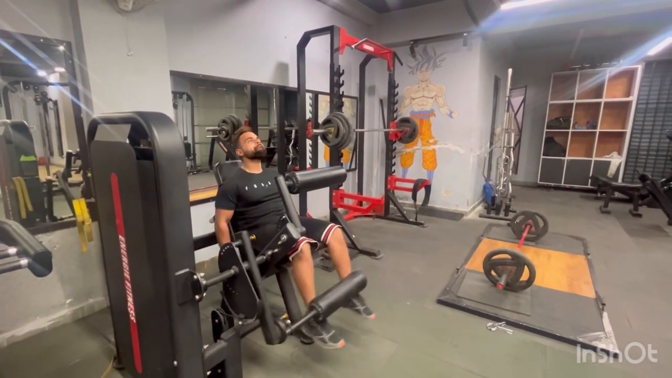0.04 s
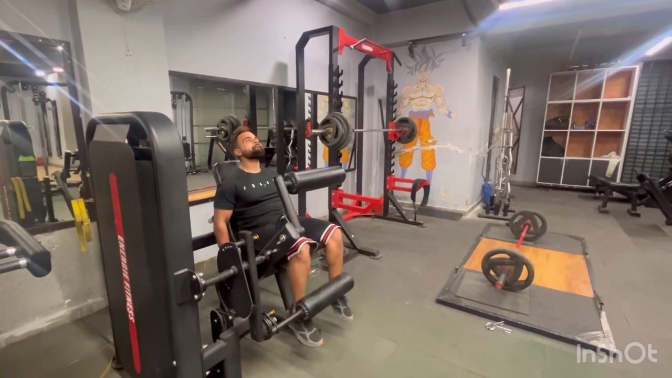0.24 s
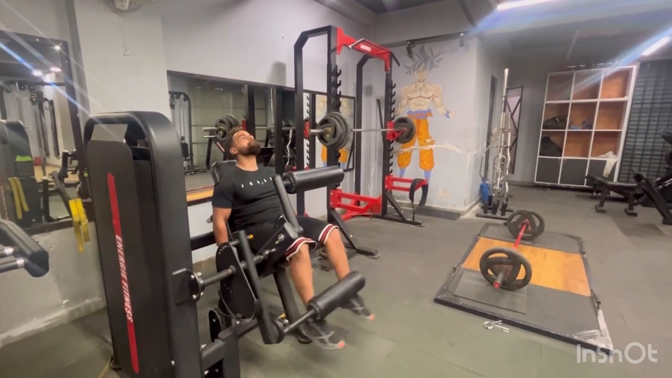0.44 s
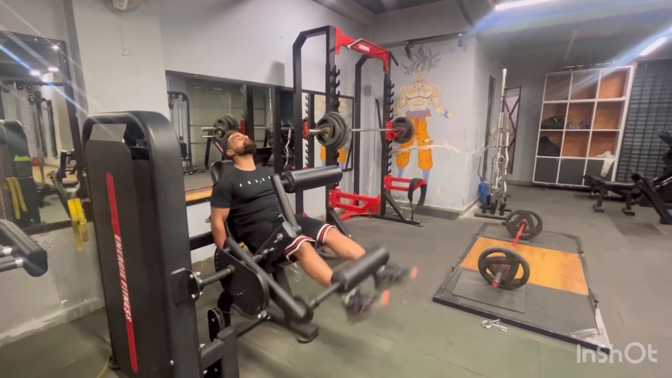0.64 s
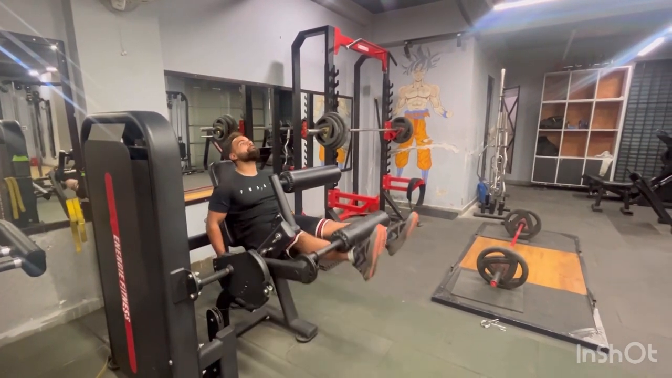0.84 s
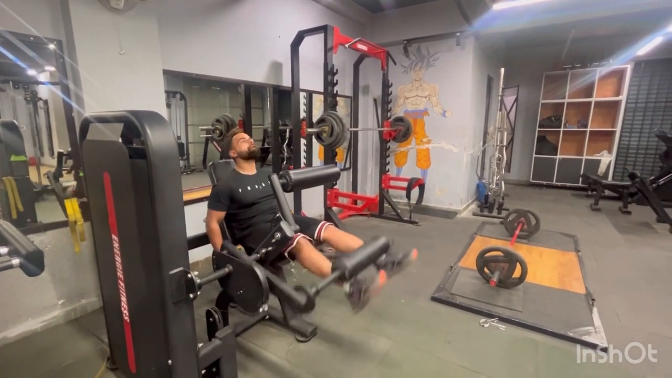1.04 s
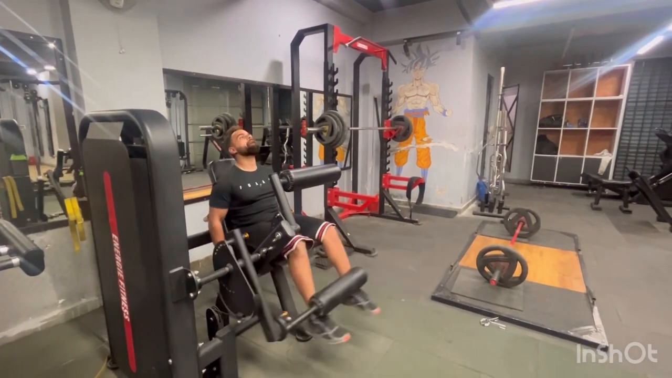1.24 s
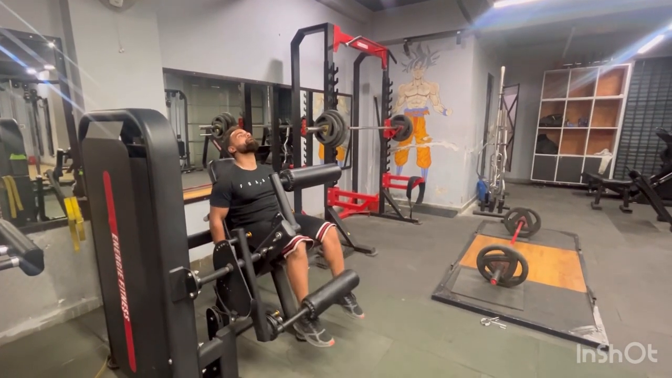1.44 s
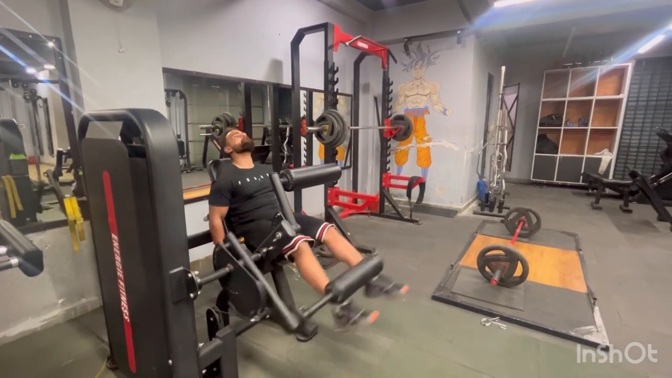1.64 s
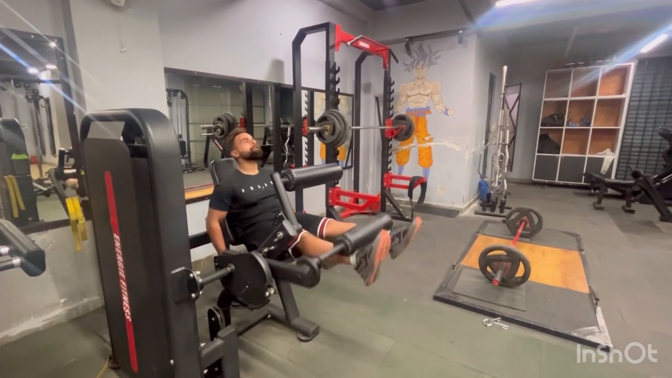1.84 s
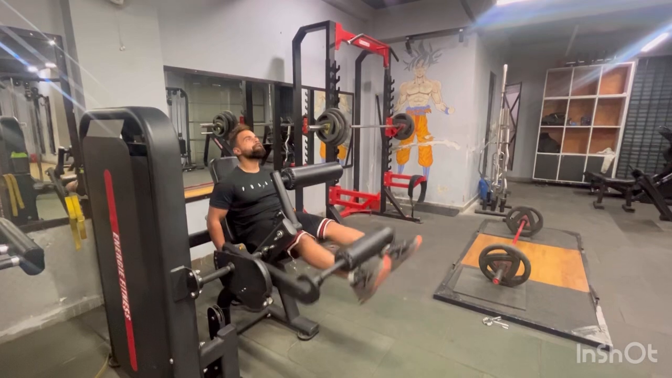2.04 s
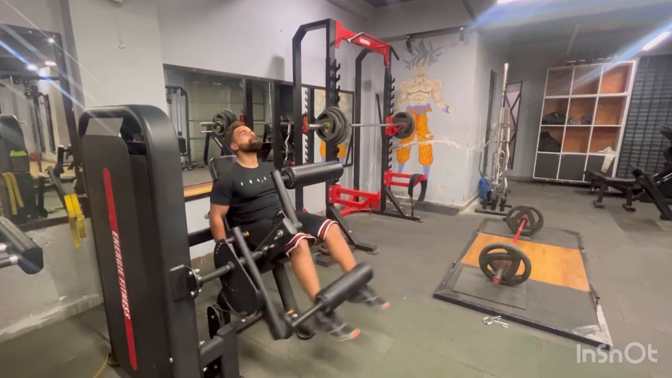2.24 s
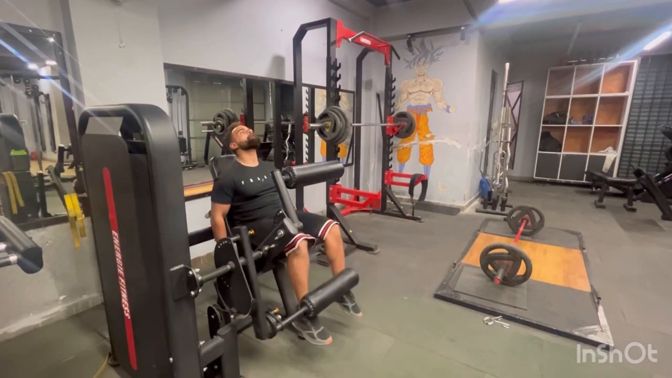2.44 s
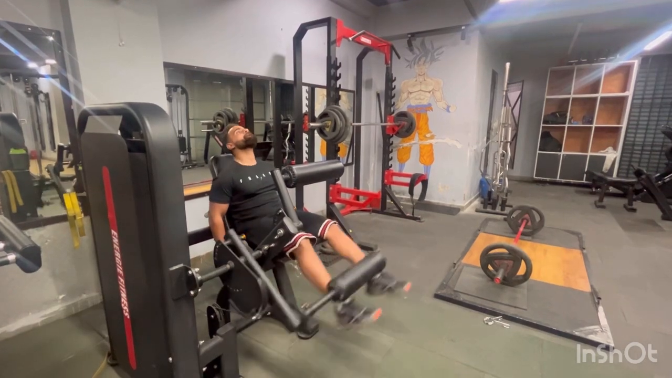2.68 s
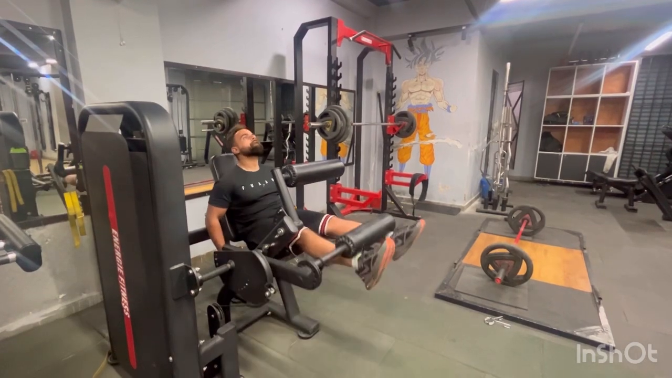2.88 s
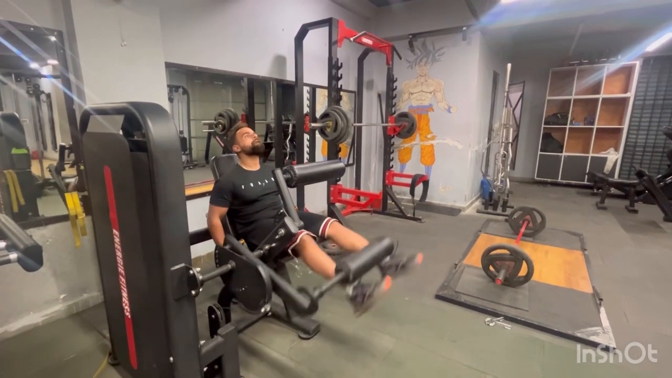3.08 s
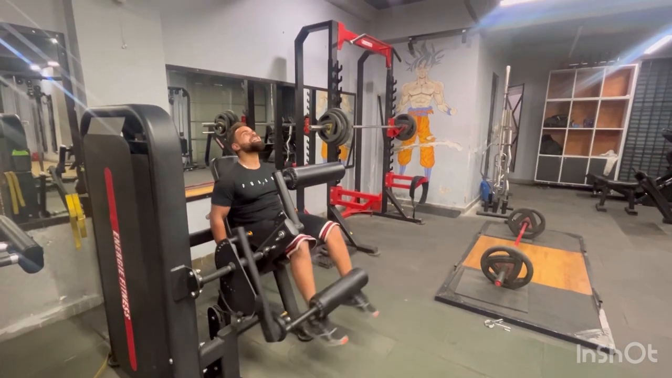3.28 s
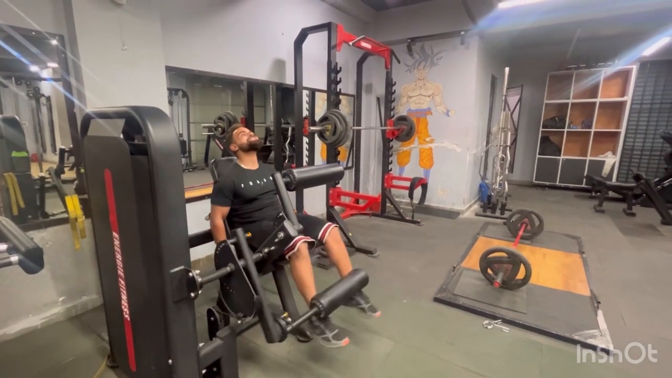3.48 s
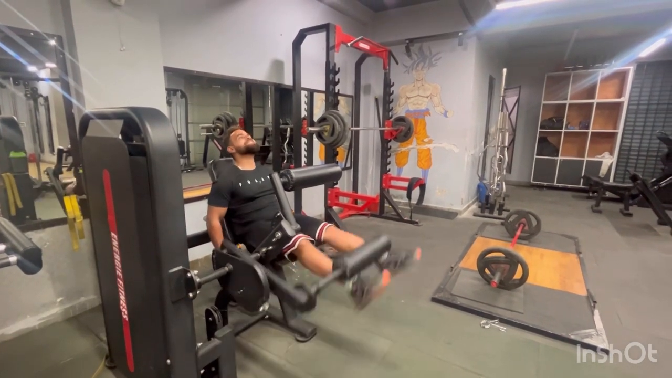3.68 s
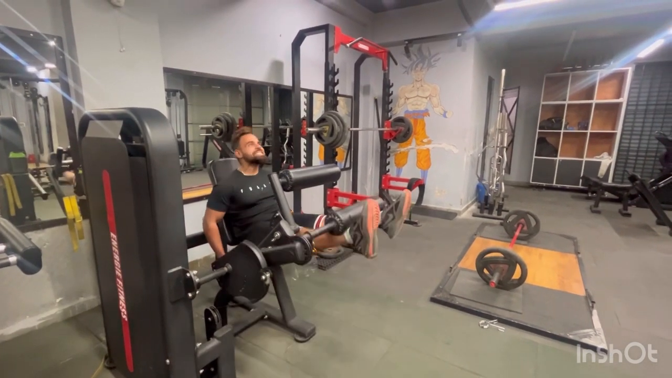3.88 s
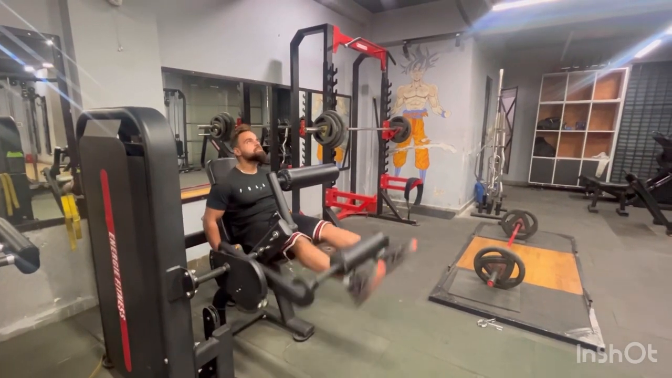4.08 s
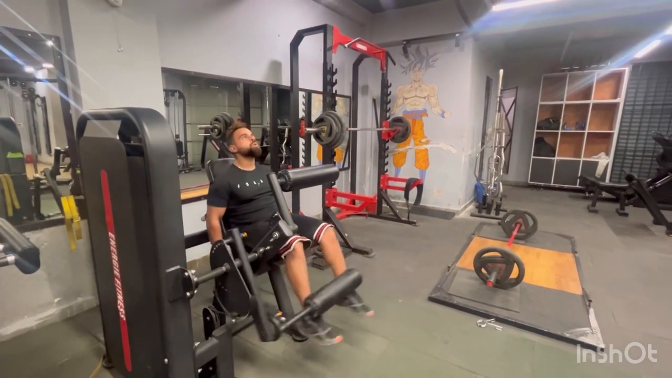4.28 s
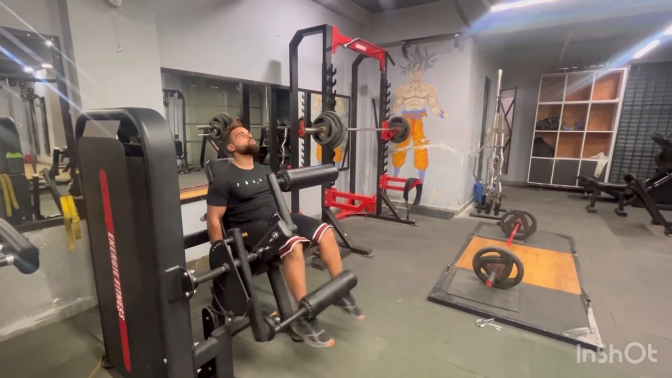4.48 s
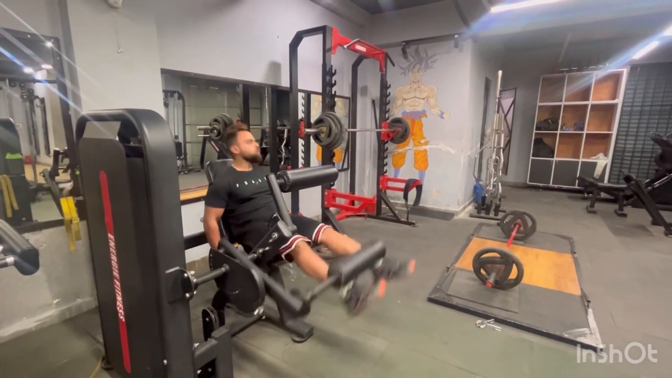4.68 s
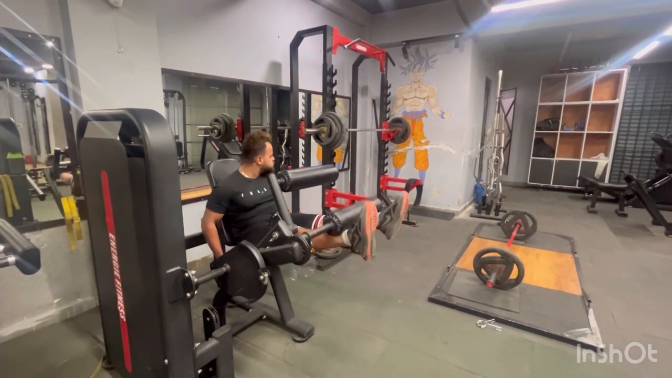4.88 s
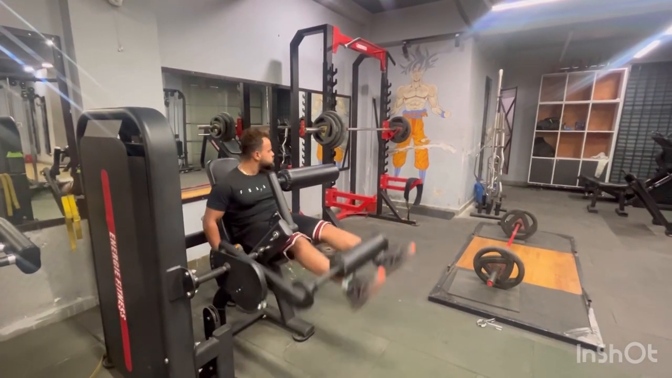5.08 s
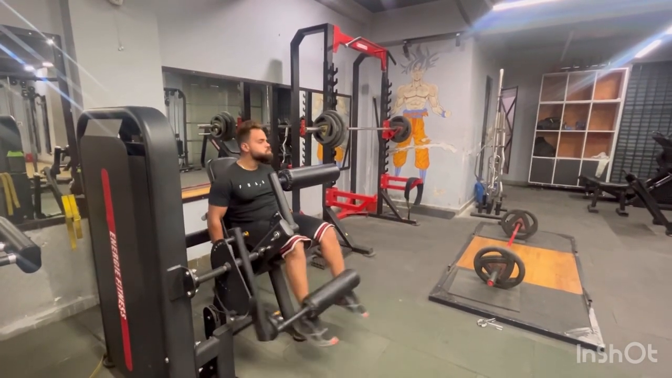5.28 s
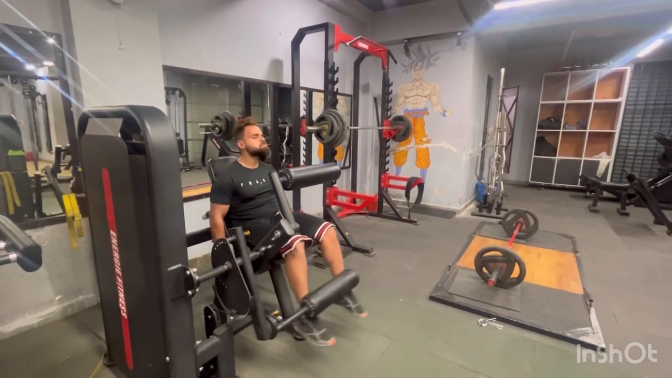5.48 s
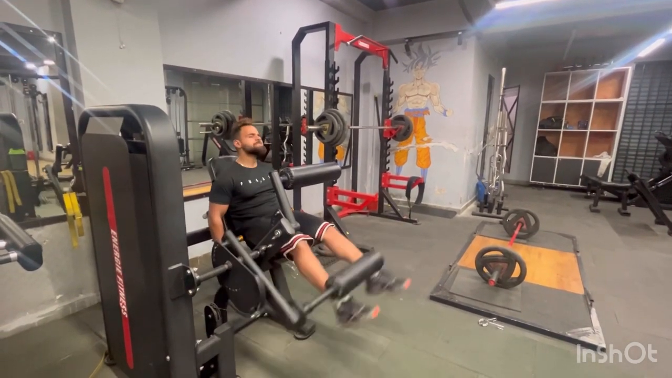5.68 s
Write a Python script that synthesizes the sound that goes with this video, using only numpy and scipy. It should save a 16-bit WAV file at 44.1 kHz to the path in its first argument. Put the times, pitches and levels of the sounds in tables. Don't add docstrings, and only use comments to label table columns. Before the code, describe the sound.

A gym leg machine gives a short piercing squeal and then a metallic clank about once a second, over a low fan hum in an echoing hall.

```python
import sys
import numpy as np
from scipy import signal
from scipy.fft import rfft, irfft
from scipy.io import wavfile

SR = 44100
rng = np.random.default_rng(int(sys.argv[2]) if len(sys.argv) > 2 else 0)


def store_pcm(level_fs):
    pcm = np.round(np.clip(level_fs, -1, 1) * 32767).astype(np.int16)
    wavfile.write(sys.argv[1], SR, np.atleast_2d(pcm).T)


def gain_from_decibels(decibels):
    exponent = np.asarray(decibels, float) / 20
    return 10 ** exponent


N = 252252

# start_s, peak_db, high_db (above 5 kHz), low_db (below 2 kHz), favoured_hz
CLANKS = [
    (0.5531, -24, 0.5, -34, 3240),
    (1.6062, -17, -1.5, -16.5, 3340),
    (2.6381, -23.5, -5, -30, 3120),
    (3.5613, -20, -1.5, -25, 3980),
    (4.5928, -22.5, 0, -22.5, 4200),
    (5.1811, -28.5, -11, -2.5, 3450),
    (5.602, -20, 2, -11, 3470),
]


def at_hz(points, hz):
    points_hz, values = np.transpose(points)
    return np.interp(np.log(hz + 1), np.log(points_hz), values)


def rms_one(x):
    return x / np.sqrt(np.mean(x ** 2) + 1e-20)


def drift(rate_hz):
    r = np.exp(-2 * np.pi * rate_hz / SR)
    wander = signal.lfilter([1], [1, -2 * r, r * r], rng.standard_normal(N + SR))
    return rms_one(wander[SR:])


def band_pass(x, low_hz, high_hz):
    return signal.sosfilt(signal.butter(2, [low_hz, high_hz], "band", fs=SR, output="sos"), x)


def diffuse(spectrum):
    # freq_hz, likeness (0 to 1)
    likeness = [(60, 0.96), (150, 0.92), (380, 0.88), (950, 0.12), (2400, 0.45), (6000, 0.13),
                (11000, 0.13), (14000, 0.81)]
    hz = np.fft.rfftfreq(N, 1 / SR)
    mid, side = rfft(rng.standard_normal((2, N))) * gain_from_decibels(at_hz(spectrum, hz))
    alike = np.clip(at_hz(likeness, hz), 0, 1)
    both = np.sqrt(1 + alike) * mid
    apart = np.sqrt(1 - alike) * side * [[1], [-1]]
    return rms_one(irfft(both + apart, N))


def fan():
    # freq_hz, level_db (per Hz)
    air_colour = [(15, -34), (25, -51.5), (52, -2.5), (85, -3.5), (124, -7), (259, -20), (389, -11.5),
                  (651, -28), (1180, -27), (5270, -44.5), (6550, -65), (10100, -37.5), (13300, -66),
                  (15200, -72), (16500, -87.5)]
    hum_hz, hum_db, air_db = 74.3, -39, -43.5
    phase = 2 * np.pi * np.cumsum(hum_hz + 0.51 * drift(1.72)) / SR
    hum = gain_from_decibels(hum_db + 2.5 + 0.47 * drift(21)) * np.sin(phase)
    return hum + gain_from_decibels(air_db + 0.83 * drift(12)) * diffuse(air_colour)


def rustle():
    # freq_hz, level_db (per Hz)
    hiss_colour = [(1180, -22.5), (2000, 4), (2380, 3.5), (4050, 4), (4940, 1), (9250, -6.5), (12000, -26),
                   (13200, -37), (14500, -22), (16000, -29)]
    # time_s, load_db
    load = [(0, -0.4), (3.5, 1.2), (4.5, 2), (4.9, 7), (5.4, 1.5), (5.72, 0)]
    rumble_colour = [(500, -5.0), (800, -5.0), (1250, -3.0), (1800, -10.0), (2600, -30.0), (5000, -58.0)]
    drone_colour = [(90, -45.5), (150, 9.0), (250, -3.5), (310, 3.5), (450, -3.5), (700, -12), (1000, -38.0)]
    hiss_db, rumble_db, drone_db = -56.5, -52, -48
    hiss_run_db, rumble_run_db, drone_run_db = 5, 1, 1
    hiss_follows, rumble_follows = 0.29, 0.19
    run_delay_s, run_s = 0.15, 0.12

    t = np.arange(N) / SR
    load_db = np.interp(t, *np.transpose(load))
    speed = sum(np.exp(-((t - s - run_delay_s) / run_s) ** 2) for s, *_ in CLANKS)
    rumble = diffuse(rumble_colour)
    drone = diffuse(drone_colour)
    hiss_level = hiss_db + hiss_run_db * speed + hiss_follows * load_db + 4.5 + drift(31)
    hiss = gain_from_decibels(hiss_level) * diffuse(hiss_colour)
    rumble_level = rumble_db + rumble_run_db * speed + rumble_follows * load_db + 3.5 + 2.4 * drift(6.3)
    drone_level = drone_db + drone_run_db * speed + load_db + 1.35 * drift(3.7)
    return hiss + gain_from_decibels(rumble_level) * rumble + gain_from_decibels(drone_level) * drone


def squeals():
    # start_s, length_s, pitch_hz, glide_hz_per_s, level_db
    lifts = [
        [(.003, .032, 4677, -1000, -17.5), (.036, .03, 4756, 4501, -19.5), (.07, 0.066, 4860, 505.5, -29)],
        [(1.268, .029, 5288, -3000, -17), (1.302, 0.015, 5160, 504, -21.5), (1.326, 0.012, 5183, 3000, -22.5)],
        [(2.294, 0.015, 5150, -1500, -24.5), (2.316, 0.015, 5167, -500, -15), (2.336, 0.021, 5250, 9002, -20.5)],
        [(3.286, 0.0356, 5353, -300, -18.5), (3.331, 0.02, 5332, 1500, -17.5), (3.336, 0.012, 5530, 99, -23),
         (3.422, 0.019, 5357, 101, -28)],
        [(4.290, 0.04, 5382, -3000, -15.5), (4.320, 0.017, 5488, 1005, -18)],
        [(5.272, 0.022, 5474, -9000, -17), (5.290, 0.0056, 5560, 9000, -15), (5.31, 0.018, 5600, -1000, -30)],
    ]
    # offset_hz, neighbour_db, octave_db, twelfth_db
    strands = [
        (-96, -4.5, -28.5, -44.5),
        (-300, -16.5, -17, -34),
        (109.5, -12.5, -16, -29),
        (158, -12.5, -20, -49),
        (122, -30, -18.5, -48.5),
        (187, -9.5, -18, -47),
    ]
    grip_s, let_go_s, sag_db_per_s = .005, 0.003, -50
    out, t = np.zeros(N), np.arange(N) / SR
    unsteady = 1 + .0025 * drift(150)
    flutter_db = 1.5 * drift(110)
    grit = 0.02 * rms_one(band_pass(rng.standard_normal(N), 200, 900))
    for slips, (offset_hz, neighbour_db, octave_db, twelfth_db) in zip(lifts, strands):
        first_s = slips[0][0]
        for s, length, hz, glide, level_db in slips:
            now = (t > s) & (t < s + length + 4 * let_go_s)
            age = t[now] - s
            phase = 2 * np.pi * np.cumsum((hz + glide * age) * unsteady[now]) / SR
            tone = np.sin(phase)
            tone += gain_from_decibels(octave_db) * (1 + 2.67 * grit[now]) * np.sin(2 * phase)
            tone += gain_from_decibels(twelfth_db) * np.sin(3 * phase)
            tone += gain_from_decibels(neighbour_db) * np.sin(phase + 2 * np.pi * offset_hz * t[now])
            tone *= 1 + grit[now] * (1 + 1.7 * np.exp(-(t[now] - first_s) / 0.01))
            attack = np.minimum(age / grip_s, 1) ** 2
            release = np.exp(-(np.maximum(age - length, 0) / let_go_s) ** 2)
            out[now] += gain_from_decibels(level_db + 5.0 + sag_db_per_s * age + flutter_db[now]) * attack * release * tone
    return out


def bumps():
    # start_s, pitch_hz, peak_db, rise_s,
    # t60_s
    pushes = [(.12, 808, -48.5, 0.055, .5), (0.408, 1743, -35.5, 0.015, 0.3), (.8, 733, -49, 0.024, 0.92),
              (1.85, 720, -43, 0.0084, 0.42), (1.959, 2950, -50, 0.041, .3), (1.16, 1320, -43, .012, 0.18),
              (2.197, 1260, -38, 0.011, 0.18), (5.179, 1210, -37, .012, 0.24),
              (3.17, 2050, -40, 0.0076, 0.083), (3.618, 197.4, -46, .05, 0.68),
              (3.8, 735, -46, 0.047, 0.32), (3.85, 2890, -51, 0.082, 0.41), (4.19, 1590, -32, 0.0073, .15),
              (4.729, 153.5, -35, 0.009, 0.16), (4.781, 184.3, -38.5, 0.097, .8),
              (4.949, 181.6, -34.5, 0.14, .7), (4.941, 3180, -52, 0.1, 1),
              (5.185, 420, -33.5, 0.013, 0.044), (5.64, 311.3, -36, .02, 0.47),
              (5.63, 461, -37.5, 0.033, 0.6), (5.63, 692, -36.5, 0.013, 0.24)]
    out = np.zeros(N)
    for s, hz, peak_db, rise, t60 in pushes:
        t = np.maximum(np.arange(N) / SR - s, 0)
        swell = np.minimum(t / rise, 1) * gain_from_decibels(-60 * np.maximum(t - rise, 0) / t60)
        out += gain_from_decibels(peak_db) * swell * np.sin(2 * np.pi * hz * t)
    return out * gain_from_decibels(3.4 * drift(45))


def ring(clicks, hz, t60):
    r, w = gain_from_decibels(-60 / (t60 * SR)), 2 * np.pi * hz / SR
    return signal.lfilter([0, np.sin(w)], [1, -2 * r * np.cos(w), r * r], clicks + 1e-18)


def contacts(events, chatter_s, ring_db, crack_db, top_db, density, damping):
    # pitch_hz, level_db, t60_s
    plates = [(1237, 5, 0.6), (1630, -12, 0.11), (1814, -1.5, 0.085), (2550, -14, 0.3), (2523, -5.5, 0.31),
              (3010, -8, 0.61), (3120, -19, 0.14), (3200, -6, 0.45), (3373, 6.5, 0.018), (3944, -1, 0.057),
              (4010, 8, 0.036), (4070, -1.5, 0.067), (4690, 7.5, 0.069), (4935, 6, 0.45), (5500, -2, 0.23),
              (5660, -0.5, 0.16), (5540, -27.5, 0.045), (6000, -1.5, 0.089), (6583, -23, 0.45),
              (6570, -22, 0.14), (7900, 7, 0.24), (7800, -11, 0.062), (8840, -5, 0.2), (9100, -21.5, 0.13)]
    dull_hz = 10300
    out, span = np.zeros(N + SR), SR
    t = np.arange(span) / SR
    for s, peak_db, high_db, low_db, favoured_hz in events:
        force = np.exp(-t / max(chatter_s, .001)) + .2 * np.exp(-t / .05)
        force *= 1 - np.exp(-t / min(chatter_s, .0025))
        clicks = rng.standard_normal(span) * (rng.random(span) < density) * force
        clicks /= np.sqrt(np.sum(clicks ** 2))

        colour = [(1500, low_db), (2300, -4), (favoured_hz, 2), (1.14 * favoured_hz, -7),
                  (5200, -9), (7000, high_db - 8)]
        luck_db, shift = rng.standard_normal((2, len(plates))) * [[4.5], [.012]]
        body = np.zeros(span)
        for (hz, db, t60), luck, e in zip(plates, luck_db, shift):
            mode_t60 = min(t60, .2) * damping * min(1, 3500 / hz) ** 2
            body += gain_from_decibels(db + at_hz(colour, hz) + luck) * ring(clicks, hz * (1 + e), mode_t60)

        low = band_pass(clicks, 900, 2400)
        middle = band_pass(clicks, 0.66 * favoured_hz, 1.25 * favoured_hz)
        high = band_pass(clicks, 4400, 9000)
        top = band_pass(clicks, 11000, 16000) * np.exp(-t / 0.0044)
        crack = gain_from_decibels(low_db + 13) * low + middle + gain_from_decibels(high_db + 3) * high
        crack = signal.sosfilt(signal.butter(6, dull_hz, fs=SR, output="sos"), crack)
        crack += gain_from_decibels(high_db + top_db) * top
        i = round(s * SR) - 110
        out[i:i + span] += gain_from_decibels(peak_db) * (gain_from_decibels(ring_db) * body + gain_from_decibels(crack_db) * crack)
    return out[:N]


def thud():
    # freq_hz, level_db (per Hz)
    thud_colour = [(180, -27), (300, 5), (600, 6), (1000, 2), (1500, 4), (2400, -29.5)]
    start_s, rise_s, level_db = 5.6, .05, -38.5
    swell = np.clip((np.arange(N) / SR - start_s) / rise_s, 0, 1)
    return gain_from_decibels(level_db + 2.5 * drift(40)) * swell * diffuse(thud_colour)


def lean(x, tilt):
    gain = gain_from_decibels(at_hz(tilt, np.fft.rfftfreq(N, 1 / SR)) / 2)
    return irfft(rfft(x) * [gain, 1 / gain], N)


def hall(x, early_db, late_db):
    # freq_hz, t60_s
    decay = [(150, 2), (1000, 2.9), (3000, 1.026), (5300, 1.063), (10500, 0.67), (16000, 0.69)]
    # freq_hz, left_minus_right_db
    shadow = [(1500, 0), (3000, -1.5), (5200, 4), (7500, -1.5), (10500, -5), (15000, 0)]
    t = np.arange(int(1.5 * SR)) / SR
    white, tail = rng.standard_normal((2, len(t))), 0
    edges = 100 * 2 ** np.arange(0, 7.6, .5)
    for low, high in zip(edges, edges[1:]):
        tail = tail + band_pass(white, low, high) * gain_from_decibels(-60 * t / at_hz(decay, np.sqrt(low * high)))
    tail *= (1 - np.exp(-(t / 0.0073) ** 2)) / np.sqrt(SR)
    tail = signal.sosfilt(signal.butter(4, 11800, fs=SR, output="sos"), tail)
    echoes = rng.standard_normal((2, len(t))) * (rng.random((2, len(t))) < 400 / SR)
    early = echoes * np.exp(-t / 0.019) * (t > .004)
    room = gain_from_decibels(late_db) * tail + gain_from_decibels(early_db) * early
    return lean(x, shadow) + signal.fftconvolve(x[None], room, axes=1)[:, :N]


def scene():
    # start_s, peak_db, high_db (above 5 kHz), low_db (below 2 kHz), favoured_hz
    ticks = [
        (1.1603, -32, -5.5, -5.5, 4100),
        (1.4481, -36, -10, -5.5, 4400),
        (2.196, -33, -8, -5, 3800),
        (3.1713, -31, -17, -6.5, 4050),
        (4.1925, -35, -27, -5, 3670),
        (5.1542, -38, 4, 0, 3220),
    ]
    # start_s, peak_db, high_db, low_db, favoured_hz
    clip = [
        (4.108, -50.5, 12.6, -14, 4430),
    ]
    clanks = contacts(CLANKS, chatter_s=0.0076, ring_db=-9, crack_db=19.0, top_db=-19.5,
                      density=0.12, damping=0.69)
    scuffs = contacts(ticks, chatter_s=0.028, ring_db=-8, crack_db=21.5, top_db=-14.5,
                      density=0.14, damping=0.078)
    snap = contacts(clip, chatter_s=.002, ring_db=-25, crack_db=22, top_db=11.5,
                    density=0.14, damping=0.17)
    machine = hall(squeals() + clanks + scuffs + snap, early_db=-5.0, late_db=13.5)
    return machine + bumps() + rustle() + fan() + thud()


def masking(x, under_db, slope_db):
    # freq_hz, level_db
    hearing = [(3000, -100), (11000, -106), (12000, -83), (13200, -77), (14200, -88), (15500, -91),
               (16500, -68)]
    hz, _, spectrum = signal.stft(x, SR, nperseg=2048, noverlap=1024)
    bands = spectrum[:, :1024].reshape(2, 64, 16, -1)
    centres = hz[8:1024:16, None]
    level_db = 10 * np.log10(np.sum(np.abs(bands) ** 2, axis=2) + 1e-20)
    slope = slope_db * centres / 1000
    loudest = level_db.max(axis=0)
    settled = np.minimum(loudest, np.roll(loudest, 1, axis=1))
    maskers = np.where(centres > 3500, settled, -200)
    hidden_db = np.maximum.accumulate(maskers + slope, axis=0) - slope - under_db
    faint_db = at_hz(hearing, centres) + 2.0 * rng.standard_normal(hidden_db.shape)
    kept = loudest > np.maximum(hidden_db, faint_db)
    spectrum[:, :1024] = (bands * kept[:, None]).reshape(2, 1024, -1)
    return signal.istft(spectrum, SR, nperseg=2048, noverlap=1024)[1][:, :N]


def band_limit(x):
    return signal.sosfilt(signal.butter(12, 17020, fs=SR, output="sos"), x)


def record(dry):
    # freq_hz, left_minus_right_db
    tilt = [(60, -2.2), (200, -3), (700, .8), (2500, -3.5), (4300, -2), (5200, 2.5), (7500, -2.5),
            (10500, -6), (15000, -1)]
    right_lag = 14
    left, right = lean(dry, tilt)
    pair = np.array([left, np.roll(right, right_lag)])
    mix = masking(pair, under_db=17.5, slope_db=9.5)
    return band_limit(mix)


dry = scene()
out = record(dry)
store_pcm(out)
```